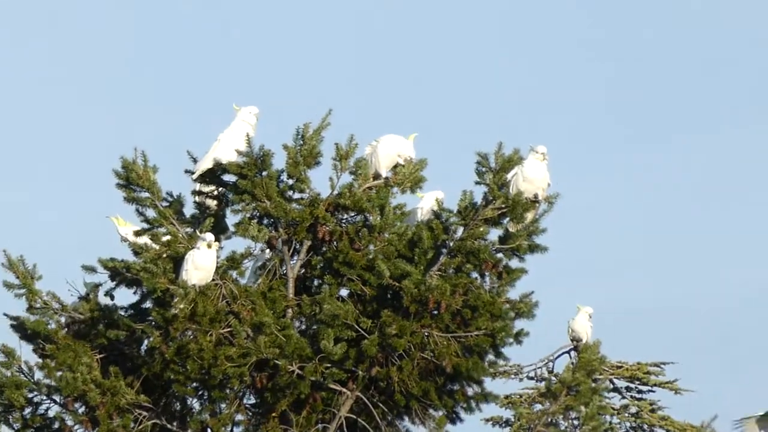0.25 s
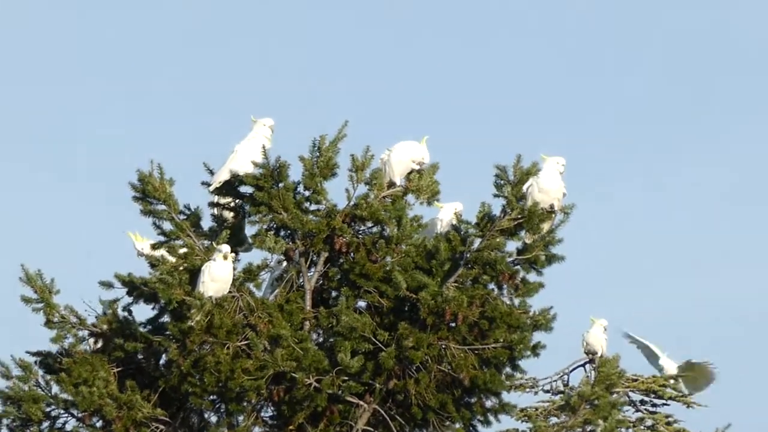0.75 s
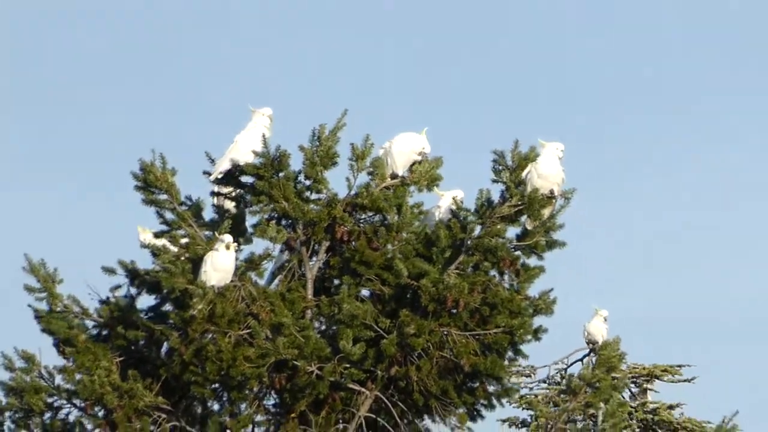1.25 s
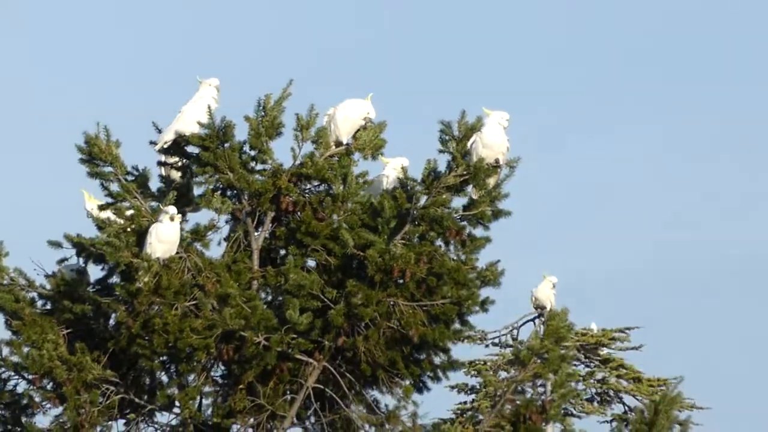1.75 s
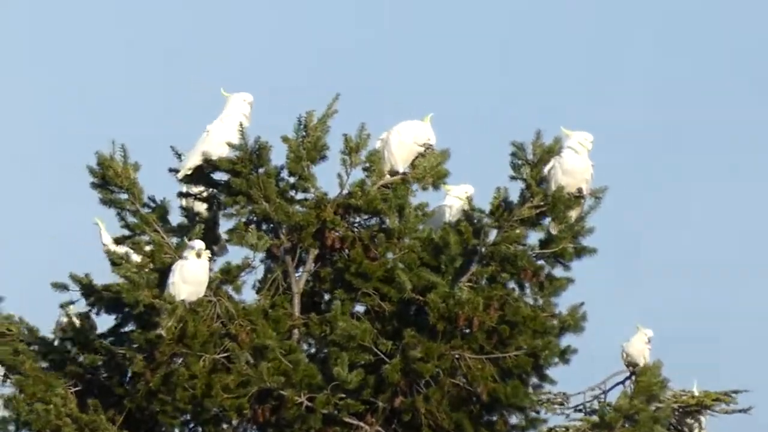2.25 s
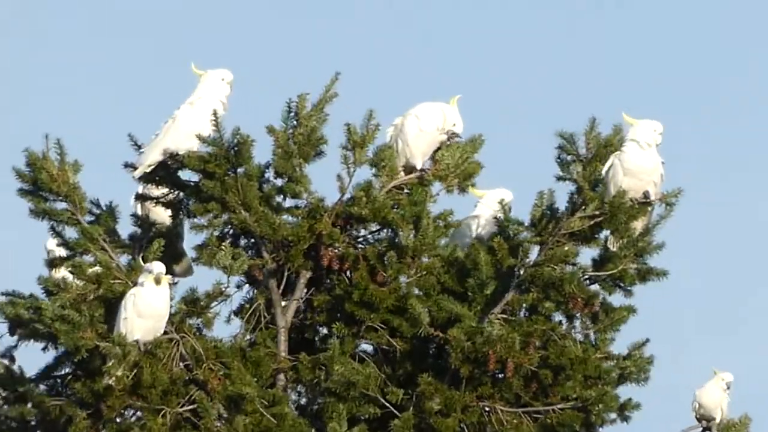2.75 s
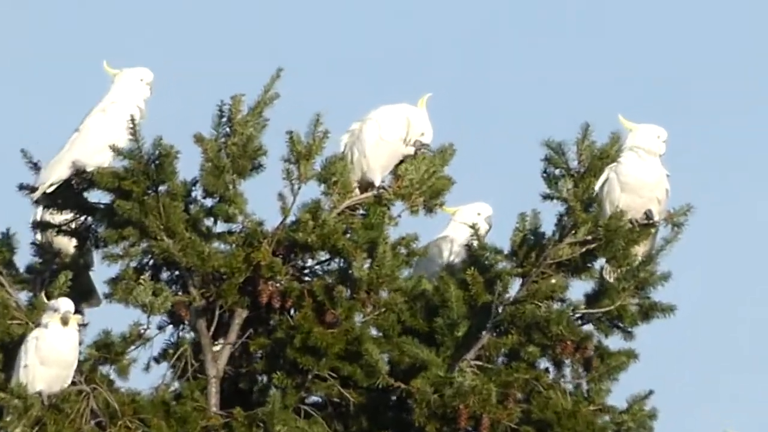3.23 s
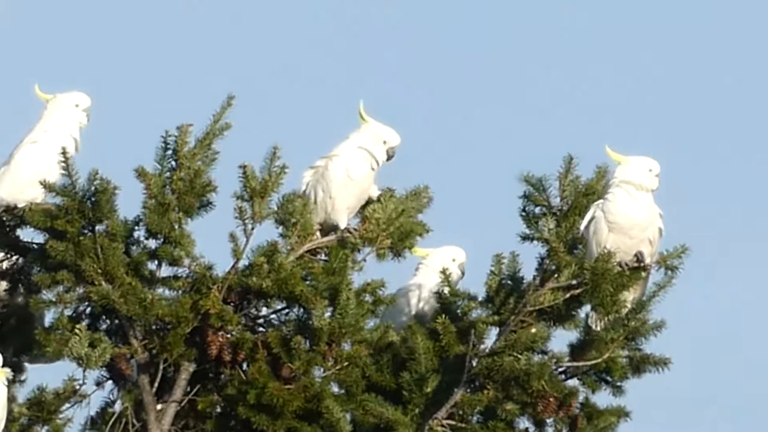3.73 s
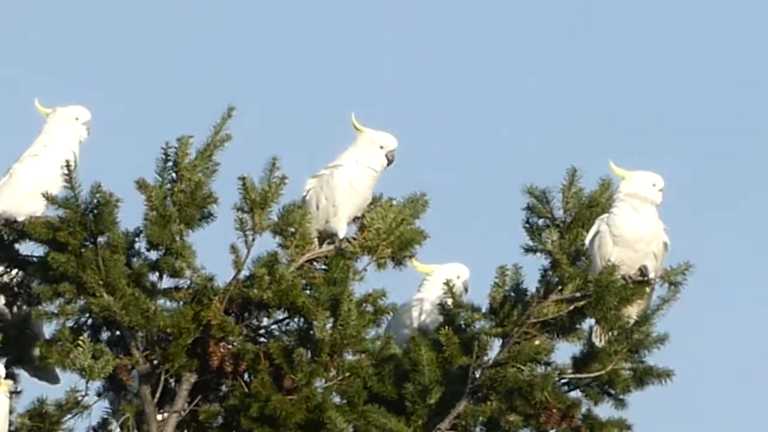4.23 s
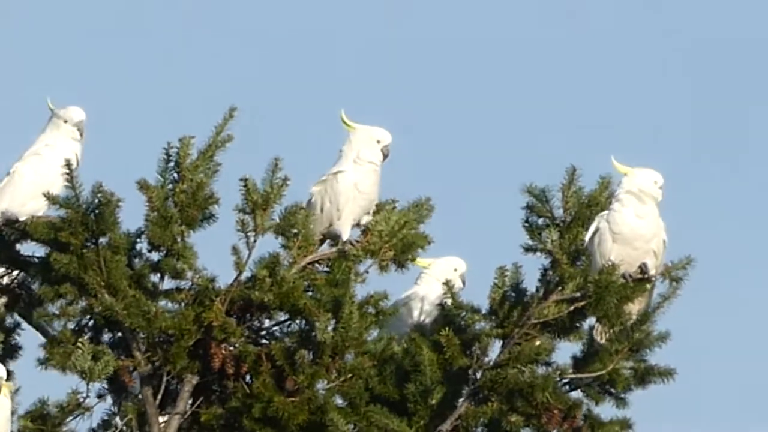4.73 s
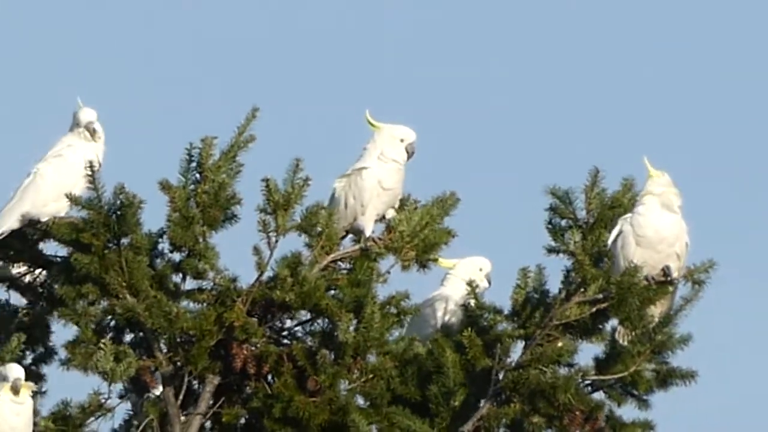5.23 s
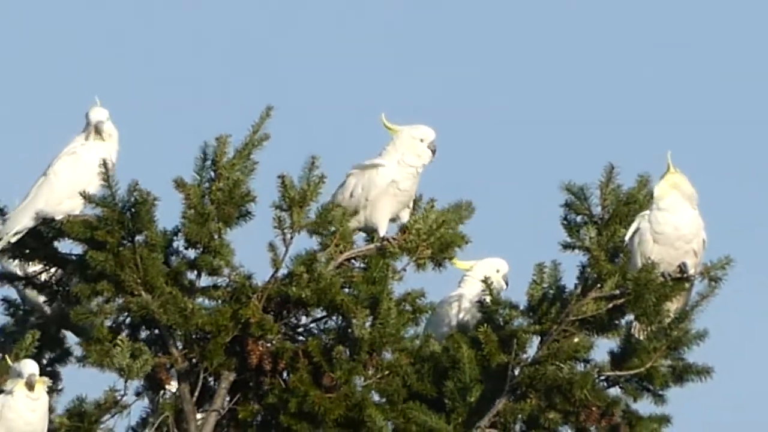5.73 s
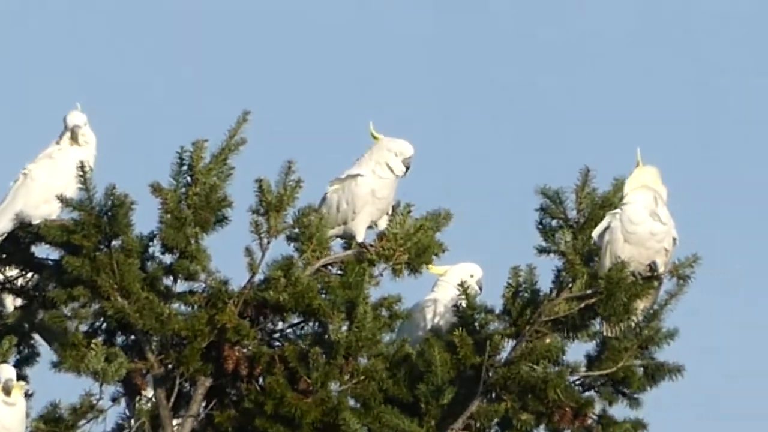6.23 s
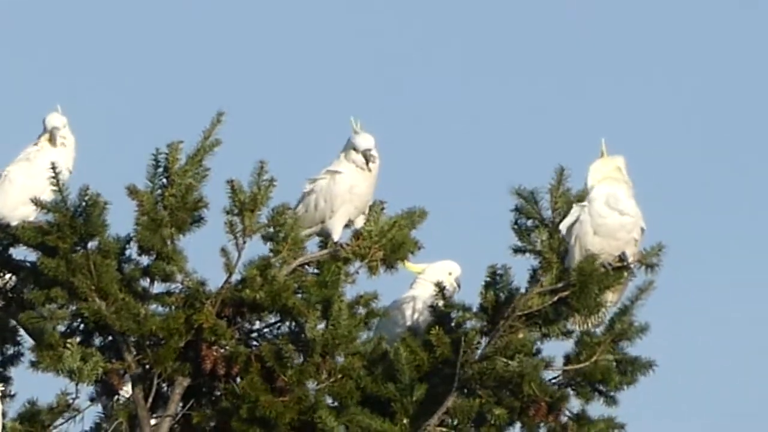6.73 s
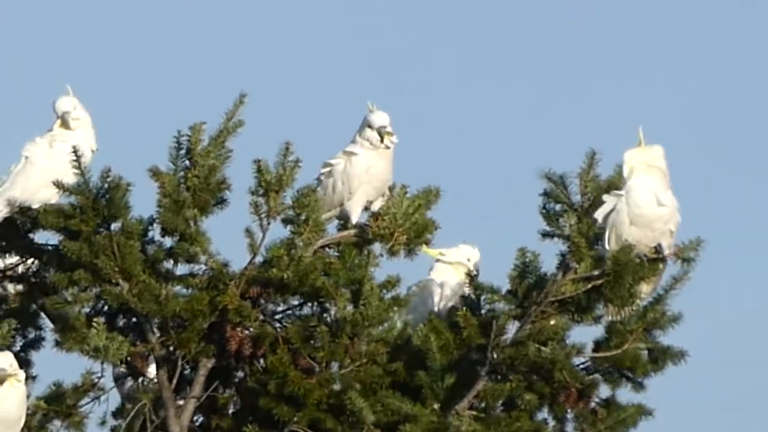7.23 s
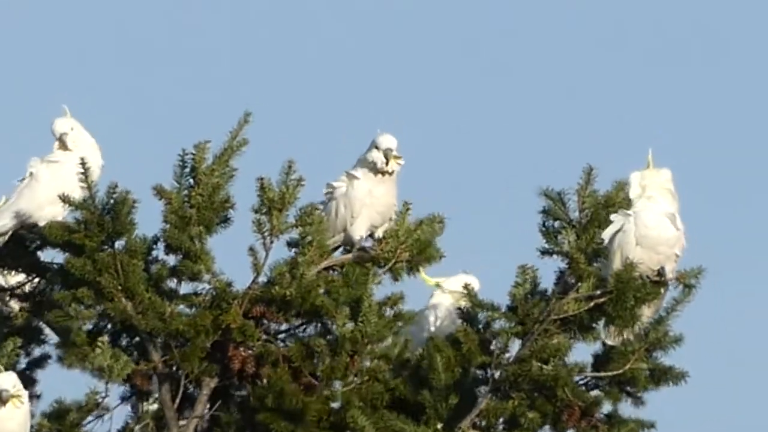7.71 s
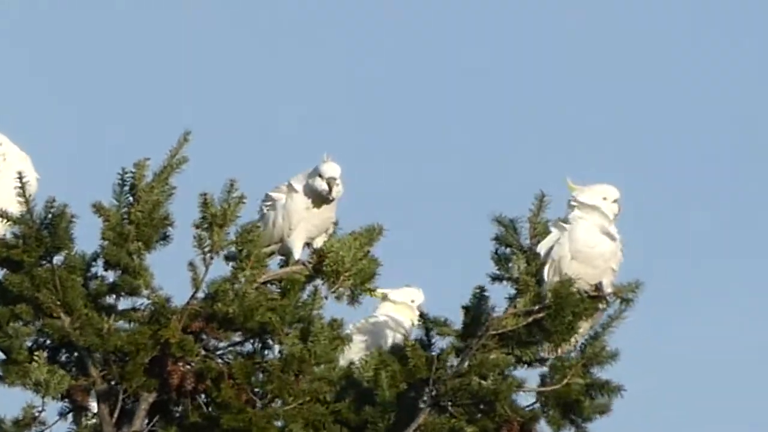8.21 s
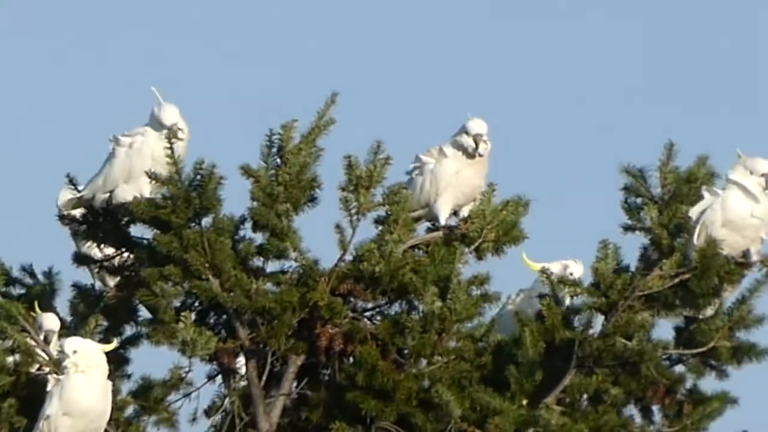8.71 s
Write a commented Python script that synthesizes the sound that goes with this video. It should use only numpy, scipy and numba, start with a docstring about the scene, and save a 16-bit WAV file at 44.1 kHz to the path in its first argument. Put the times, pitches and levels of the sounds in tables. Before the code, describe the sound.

Outdoors, hoarse cockatoo screeches and squawks erupt, pause, then gather again, with thin bird whistles, sharp woody clicks and a faint road.

```python
"""A short hoarse screech and thin gliding whistles sound first, over the steady hiss and roar of a distant road.
Cockatoos call in the crown of a conifer, some calls direct and others mostly by way of the trees.
Syrinx pulses make hoarse screeches, wavering harmonics clear squawks and slapping membranes long rasps, all rung
through throat, mouth and beak. Small birds are gliding sines, dry clicks are decaying woody modes, and rustles,
cheeps and wind are swells of noise. The road is shaped noise that rises and falls; one louder car hums by late on."""
import sys
import numpy as np
from scipy import signal
from scipy.fft import rfft, irfft, next_fast_len
from scipy.io import wavfile
from scipy.ndimage import uniform_filter1d, map_coordinates
from numba import njit

SR = 44100
rng = np.random.default_rng(int(sys.argv[2]) if len(sys.argv) > 2 else 0)


def master_out(mix):
    """Clip the mix to full scale and print it as 16-bit PCM to the path in sys.argv[1]."""
    frames = np.transpose(np.atleast_2d(mix))
    ceiling = np.clip(frames, -1, 1)
    pcm = np.round(ceiling * 32767).astype(np.int16)
    wavfile.write(sys.argv[1], SR, pcm)


N = 395136
TIME = np.arange(N) / SR

# beak resonances of the cockatoos: centre_hz, width_hz, level_db (relative)
BEAK = [(4150, 660, 3), (4870, 1800, 2.5), (6080, 540, -4), (6650, 300, -10), (9300, 430, -41)]
# spectrum of tyre roar on the road: frequency_hz, level_db (per Hz, relative)
TYRE_SPECTRUM = [(40, -45), (250, -24), (450, -2.5), (580, -3.5), (720, -0.5), (1000, -2), (1400, -4),
                 (2000, -6), (2800, -16), (4500, -24.5), (8000, -56)]
# spectrum of the low road rumble: frequency_hz, level_db (per Hz, relative)
RUMBLE_SPECTRUM = [(20, -47), (45, -25), (90, -6.5), (160, -4), (230, 5), (330, 2.5), (450, 2.5),
                   (800, -38)]


def undb(db):
    """Decibels to gain."""
    return 10 ** (np.asarray(db) / 20)


def unit(x):
    """Scale to rms 1."""
    return x / np.sqrt(np.mean(x ** 2) + 1e-20)


def follow(rows, t):
    """The columns of a curve, interpolated at times t."""
    s, *columns = np.transpose(rows)
    return [np.interp(t, s, column) for column in columns]


def wander(n, hz):
    """Smooth random drift of spread about 1, drawing a new value hz times a second."""
    step = max(int(SR / hz), 1)
    steps = np.repeat(rng.standard_normal(n // step + 4), step)
    return 1.2 * uniform_filter1d(steps, step)[step:step + n]  # 1.2 restores the spread lost in smoothing


def arch(progress):
    """The push behind a call: 0 at both ends, 1 in the middle."""
    return 4 * progress * (1 - progress)


def glide(progress, turn, start_hz, turn_hz, end_hz):
    """A pitch that eases into a turning point and curves away again."""
    away = np.interp(progress, [0, min(turn, 1), 1], [1, 0, 1]) ** 2
    far_hz = np.where(progress < turn, start_hz, end_hz)
    return turn_hz + (far_hz - turn_hz) * away


def bell(hz, centre_hz, width_hz):
    """Gain of one steep resonance at hz."""
    return 1 / (1 + ((hz - centre_hz ** 2 / hz) / width_hz) ** 2)


def resonate(x, modes):
    """Parallel resonances, each filtered twice for steepness; rms 1."""
    out = 0
    for hz, width, db in modes:
        b, a = signal.iirpeak(min(hz, SR / 2.3), max(hz / width, .8), fs=SR)
        once = signal.lfilter(b, a, x)
        out = out + undb(db) * signal.lfilter(b, a, once)
    return unit(out)


def formants(x, modes, scale=1):
    """Overlapping steep resonances whose powers add; rms 1."""
    size = next_fast_len(len(x), real=True)
    hz = np.fft.rfftfreq(size, 1 / SR) / scale + 1  # the 1 Hz avoids division by zero
    power = sum((undb(db) * bell(hz, centre, width)) ** 2 for centre, width, db in modes)
    return unit(irfft(rfft(x, size) * np.sqrt(power), size)[:len(x)])


def add(track, s, x):
    """Mix x into the track from time s, cutting what falls outside."""
    i = int(s * SR)
    lo, hi = max(i, 0), min(i + x.shape[-1], N)
    track[..., lo:hi] += x[..., lo - i:hi - i]


def outdoor_noise(spectrum, bass_side_db=8, treble_side_db=-7):
    """Diffuse noise at two close microphones: wide in the bass, nearly alike above."""
    log_hz = np.log(np.fft.rfftfreq(N, 1 / SR) + 1)
    hz, db = np.transpose(spectrum)
    mid, side = rfft(rng.standard_normal((2, N))) * undb(np.interp(log_hz, np.log(hz), db))
    side_db = np.interp(log_hz, np.log([120, 330, 1000]), [bass_side_db, -2, treble_side_db])
    mid, side = irfft(mid, N), irfft(side * undb(side_db), N)
    return np.array([mid + side, mid - side]) / np.std(mid)


def background(tyre_db=1, hiss_db=-59, flicker_db=1, rumble_db=-59.5, rumble_follow=0.23):
    """Tyre roar of the distant road, a rumble that swells with it (dB per dB of roar), and a steady hiss."""
    # swells of the road: time_s, roar_db (before tyre_db is added)
    road_swells = [(.5, -57.5), (1.2, -55), (3.3, -53.5), (3.9, -50.5), (4.5, -42), (5.3, -47.5),
                   (6.8, -46.5), (7.8, -47.5), (8.8, -48)]
    # spectrum of the hiss: frequency_hz, level_db (per Hz, relative)
    hiss_spectrum = [(30, -9), (500, -20), (2200, 4.5), (4000, -2), (6000, -5), (8000, -12), (9800, -10.5),
                     (12500, -17.5), (15500, -24)]
    roar_db, = follow(road_swells, TIME)
    roar = outdoor_noise(TYRE_SPECTRUM) * undb(roar_db + tyre_db + flicker_db * wander(N, 11))
    swell_db = rumble_follow * (roar_db - roar_db.mean())
    rumble = outdoor_noise(RUMBLE_SPECTRUM) * undb(rumble_db + swell_db)
    return roar + rumble + undb(hiss_db) * outdoor_noise(hiss_spectrum)


def syrinx(hz, rough):
    """Membrane pulses; roughness unsettles their timing, adds a second beating vibration and rattling air."""
    n = len(hz)
    jitter = (.18 * rough ** 1.8 + .005) * wander(n, 700)
    jitter = jitter + .05 * rough * wander(n, 90) + .025 * rough * wander(n, 22)
    phase = 2 * np.pi * np.cumsum(hz * (1 + jitter)) / SR
    # a weak fundamental; the upper partials lag, so each pulse is a short chirp
    pulses = unit(sum(min(k / 2, 1) * np.cos(k * phase - .1 * k * k) for k in np.arange(1, 21)))
    second = 2 * np.pi * np.cumsum(hz * (.38 + .07 * wander(n, 18))) / SR
    beating = rough * .8 * np.cos(second)
    roughening = .35 * rough ** 2 * np.tanh(wander(n, 650))
    pulses = unit(pulses * (1 + beating + roughening))
    air = unit(rng.standard_normal(n) * (1 + .6 * np.cos(phase)))
    rattle = 1 + .38 * rough * np.tanh(wander(n, 200))
    return (pulses + .9 * rough ** 1.4 * air) * rattle, air * rattle


def branches(x, count=5):
    """A few short reflections whose paths shift as the bird bobs: partials stand out unevenly and waver."""
    n = np.arange(len(x))
    out = x
    for lag_s in rng.uniform(.001, .009, count):
        lag = SR * (lag_s + .00006 * wander(len(x), 12))
        reflection = map_coordinates(x, [n - lag], order=3)
        out = out + .36 * rng.choice([-1, 1]) * reflection
    return unit(out)


def screeches():
    """Short hoarse syrinx calls through throat, mouth and beak; returns direct sound and feed to the trees."""
    # one screech a row: start_s, length_s, level_db (mouth band, direct and trees together), swell_db (start to
    # end), start_hz, end_hz (pitch), roughness (in mid-call, held to 0-1), throat_db (relative),
    # gape_db (upper minus lower mouth, before the cut and sag below), beak_db (relative),
    # scale (of the mouth resonances, ratio), wet_db (trees relative to direct)
    calls = [ (0, 0.045, -41.5, -12, 731, 707, 1.02, -4.5, -8, -21, 1.16, 1.5),
             (0.97, 0.18, -47.5, 6.5, 621.5, 641, 0.77, -8.5, -4, -18, 0.98, -0.5),
             (1.262, 0.2, -45, 3.5, 776, 700, 0.76, -7.5, 3, -12, 1.1, -5),
             (1.462, 0.22, -41, 4, 641, 600, 0.75, -6, -9, -30, 1.16, -2),
             (5.509, 0.14, -43.5, -2, 690, 762, 0.78, -12, -1, -2.5, 1.15, 8),
             (5.603, 0.093, -37, 1, 793, 889, 0.55, -27, 5, -10.5, 1.24, -0.5),
             (5.711, 0.12, -36, -9, 759.4, 631, 0.73, -10, -3, -20, 1.08, -8.5),
             (5.97, 0.14, -48.5, -17, 570, 543, 0.68, -13, 14, -2.5, 1.02, -11),
             (6.32, 0.12, -46.5, 6, 710, 747, 0.54, -10, 26, -25, 0.98, -10),
             (6.572, 0.12, -43, -12, 618, 627, 0.79, -4, -16, -8, 1.18, -0.5),
             (6.679, 0.21, -39.5, 6, 686.3, 637, 0.6, -10, 0.5, -13.5, 1.13, -0.5),
             (6.885, 0.14, -36.5, 0, 586, 546, 0.61, -24, -3, -8.5, 1.16, -0.5),
             (7.062, 0.125, -52, -12, 623, 610, .55, -20, -6, 2, 0.83, -1),
             (7.777, 0.2, -50, 14, 660, 674, 0.82, -2.5, 8, -15, 1.01, -1),
             (7.952, 0.23, -43.5, 7, 680, 645, 0.63, -18, 4, -14.5, 1.04, -3),
             (8.261, 0.19, -46, -1, 661, 688, .5, -6, -4, -15, 1.06, -3),
             (8.445, 0.21, -34, 1.5, 640.4, 536.5, 0.75, -10, -3, -17, 1.066, 0),
             (8.825, 0.05, -35, 10, 805, 691, 0.59, -3.5, 7, -7, 1.02, -1),
             (8.874, 0.13, -32, 3, 645, 620, 0.58, -5, -4, -16, 1.15, -3.5)]
    # throat resonances: centre_hz, width_hz, level_db (relative)
    throat_modes = [(700, 220, -7), (1230, 460, 0), (1600, 400, -5)]
    # mouth with the beak nearly shut: centre_hz, width_hz, level_db (relative); centre and width before scale
    shut_mouth = [(2086, 480, 5), (2400, 430, 0)]
    # mouth with the beak wide open: centre_hz, width_hz, level_db (relative); centre and width before scale
    open_mouth = [(2870, 410, 0.69), (3260, 290, -1.6)]
    attack_s, attack_share, release_s = .03, .014, .0285  # attack grows by this share of the call's length
    pitch_rise, rough_sag = .00993, .14  # shares: pitch gained in mid-call, roughness lost at both ends
    gape_cut_db, gape_sag_db = 2, 2  # throughout, and further at both ends
    beak_opens_s = .053  # time constant: the treble comes in after the voice
    direct, scattered = np.zeros(N), np.zeros(N)
    for (start, length, db, swell_db, start_hz, end_hz, rough,
         throat_db, gape_db, beak_db, scale, wet_db) in calls:
        t = np.arange(start - attack_s / 2, start + length + release_s / 2, 1 / SR)
        progress = np.linspace(0, 1, len(t))
        push = arch(progress)
        slack = 1 - push
        hz = (start_hz + (end_hz - start_hz) * progress) * (1 + pitch_rise * push)
        source, air = syrinx(hz, np.clip(rough * (1 - rough_sag * slack), 0, 1))
        source = branches(source)
        # a wider beak moves the energy to the upper resonances
        gape = undb(gape_db - gape_cut_db - gape_sag_db * slack)
        mouth = formants(source, shut_mouth, scale) + gape * formants(source, open_mouth, scale)
        mouth = mouth / np.hypot(1, gape)
        beak_gain = undb(beak_db) * (1 - np.exp(-(t - t[0]) / beak_opens_s))
        call = undb(throat_db) * formants(source, throat_modes) + mouth
        call = call + beak_gain * formants(source + air / 2, BEAK)
        fade_in = (t - t[0]) / (attack_s + attack_share * length)
        fade_out = (t[-1] - t) / release_s
        fade = np.sqrt(np.clip(np.minimum(fade_in, fade_out), 0, 1))
        effort = fade * undb(db + swell_db * (progress - .5))
        call = call * effort / np.hypot(1, undb(wet_db))  # far birds arrive more by way of the trees
        add(direct, t[0], call)
        add(scattered, t[0], call * undb(wet_db))
    return direct, scattered


def trees(x, t60=0.93, treble_t60=0.026, early_s=0.27, early_db=8, side_db=-6):
    """Dense early scatter from nearby branches, then a tail that loses its treble first."""
    t = np.arange(SR) / SR
    noise = rng.standard_normal((2, SR))
    low = signal.sosfilt(signal.butter(2, 3800, fs=SR, output="sos"), noise)
    high = signal.sosfilt(signal.butter(2, 3800, "high", fs=SR, output="sos"), noise)
    decay = undb(-60 * t / t60)
    tail = low * decay + high * undb(-60 * t / treble_t60)
    early = 1 + undb(early_db) * np.exp(-t / early_s)
    response = tail * early / np.linalg.norm(early * decay)
    mid, side = signal.fftconvolve(x[None], response, axes=1)[:, :N]
    return np.array([mid + undb(side_db) * side, mid - undb(side_db) * side])


def small_birds(waver=0.0082, flutter_db=2, sag_db=4.5):
    """Thin gliding whistles with a weak octave, softer at both ends than in the middle."""
    # one whistle a row: start_s, length_s, turn (share of the length), start_hz, turn_hz, end_hz (pitch),
    # level_db (in the middle), swell_db (start to end), octave_db (relative)
    whistle_rows = [ (0, 0.19, 0.1, 7900, 8230, 6660, -56.5, 1, -30),
                    (0.201, 0.073, 0.166, 5640, 4430, 4740, -38, -6, -21),
                    (0.261, 0.09, 0.1, 4690, 4736, 5240, -48.5, -10, -16),
                    (0.616, 0.18, 0.85, 8900, 7500, 8200, -57.5, 15, -30),
                    (0.797, 0.21, 0.53, 7800, 7920, 6800, -53, -4, -35),
                    (1.404, 0.07, 0.45, 4780, 4700, 4530, -56, 0, -30),
                    (4.08, 0.08, 0.68, 2054, 2410, 2430, -40.5, 1, -9),
                    (5.669, 0.069, 0.7, 5080, 5350, 5360, -46.5, -2, -35),
                    (5.702, 0.043, .4, 6470, 6370, 6400, -59, 0, -30),
                    (7.837, 0.21, 0.95, 7300, 8200, 8150, -61.5, 0, -30),
                    (8.155, 0.094, 0.36, 4260, 4160, 4700, -45.5, -1, -28),
                    (8.577, 0.24, .52, 8200, 8620, 6860, -66.5, 20, -30)]
    out = np.zeros(N)
    for start, length, turn, start_hz, turn_hz, end_hz, db, swell_db, octave_db in whistle_rows:
        n = int(length * SR)
        progress = np.linspace(0, 1, n)
        hz = glide(progress, turn, start_hz, turn_hz, end_hz)
        phase = 2 * np.pi * np.cumsum(hz * (1 + waver * wander(n, 186))) / SR
        tone = np.sqrt(2) * (np.sin(phase) + undb(octave_db) * np.sin(2 * phase))
        level_db = db + swell_db * (progress - .5) - sag_db * (1 - arch(progress))
        level_db = level_db + flutter_db * wander(n, 94)
        add(out, start, tone * undb(level_db) * signal.windows.tukey(n, .08))
    return out


def puffs(wind_side_db=8, cheep_side_db=-6, rustle_side_db=0):
    """Brief swells of band noise; wind pushes the two microphones in opposite ways."""
    # soft rustles, hoarse far-off cheeps and puffs of wind:
    # centre_s, half_length_s, centre_hz, width_hz, level_db (at the height of the swell)
    puff_rows = [(0.726, 0.016, 3730, 900, -49), (0.722, 0.024, 10000, 9000, -56),
                 (1.082, 0.023, 6750, 700, -52.5), (4.215, 0.051, 5630, 900, -50),
                 (2.807, 0.076, 4760, 600, -48.5), (2.913, 0.073, 4400, 594, -57),
                 (3.501, 0.063, 99.5, 61.3, -53), (7.008, 0.029, 10400, 3970, -57.5),
                 (7.13, 0.055, 9700, 7060, -54), (8.17, 0.037, 137, 127, -32.5), (8.32, 0.1, 116, 81, -47)]
    out = np.zeros((2, N))
    for s, half, hz, width, db in puff_rows:
        t = np.arange(-3 * half, 3 * half, 1 / SR)
        mid, side = resonate(rng.standard_normal((2, len(t))), [(hz, width, 0)])
        side_db = np.interp(hz, [150, 4000, 10000], [wind_side_db, cheep_side_db, rustle_side_db])
        side = side * undb(side_db)
        swell = undb(db) * np.exp(-(t / half) ** 2)
        add(out, s + t[0], unit(np.array([mid + side, mid - side])) * swell)
    return out


def clicks(crack_t60=0.0096, damping=0.56):
    """Short woody rings with a bright crack on top; duller clicks stir little but the main mode."""
    # one dry click a row: start_s, level_db (peak of the ring before panning), treble_db (crack relative to
    # ring), ring_hz, pan_db (left minus right)
    click_rows = [(0.968, -41.5, -11, 3750, -6), (2.96, -35, -9, 3650, -5), (3.0799, -37, -13, 3700, -6),
                  (3.0973, -15, 1.5, 3520, -4.5), (3.1831, -25, -14, 3650, -9),
                  (3.307, -31.5, -20, 3520, -6), (3.5626, -34, -27, 3580, -6),
                  (4.1058, -26.5, -13, 3630, -7), (4.369, -25.5, -4.5, 2960, 1)]
    # modes of the ring: ratio (to ring_hz), t60_s, level_db (relative, before treble_db acts on it)
    click_modes = [(0.381, 0.012, -7), (0.69, 0.012, -1.5), (1, 0.009, 4), (1.48, 0.006, -5.5)]
    out, t = np.zeros((2, N)), np.arange(SR // 40) / SR
    for s, db, treble_db, ring_hz, pan_db in click_rows:
        ring = 0
        for ratio, t60, mode_db in click_modes:
            dulled_db = mode_db + damping * treble_db * abs(np.log2(ratio))
            ring = ring + undb(dulled_db - 60 * t / t60) * np.sin(2 * np.pi * ring_hz * ratio * t)
        ring = ring * np.minimum(t * ring_hz, 1)  # builds up over one cycle
        burst = rng.standard_normal((2, len(t))) * undb(-60 * t / crack_t60)
        crack = resonate(burst, [(8400, 13000, 0)])
        click = ring / np.abs(ring).max() + undb(treble_db) * crack / np.abs(crack).max()
        add(out, s, undb(db + np.array([[pan_db], [-pan_db]]) / 2) * click)
    return out


def squawks(throat_hz=1280, throat_width_hz=480, fundamental_db=-7, beak_db=-24):
    """Clear voiced calls: a wavering harmonic stack through throat and mouth, each partial fluttering."""
    # one squawk a row: start_s, length_s, turn (share of the length), start_hz, turn_hz, end_hz (pitch),
    # level_db (direct and trees together), swell_db (start to end), waver (pitch, share), mouth_hz,
    # mouth_width_hz, throat_db (relative to mouth), wet_db (trees relative to direct)
    squawk_rows = [ (1.107, 0.081, 0.52, 665, 705, 694, -50, 5, 0.0073, 2500, 1000, 2, -21),
                   (1.185, 0.11, 0.55, 825, 859, 852, -42.5, -2, 0.0098, 2150, 1900, -16, -1),
                   (1.271, .2, 0.1, 940, 956, 680, -51, 4, 0.013, 2800, 1200, 11, -1),
                   (1.435, 0.23, 0.4, 638, 607, 602, -44, 6, 0.0035, 2600, 1000, 15, -6),
                   (2.605, 0.094, 0.57, 650, 670.4, 590, -29, 0, 0.0082, 2400, 1510, 5.5, -13),
                   (5.22, .08, .6, 620, 642, 638, -42.5, -6, .003, 2560, 400, -20, -9),
                   (5.463, 0.063, 0.63, 590, 680, 666, -48, -5, 0.015, 2050, 500, -15, -10),
                   (5.599, 0.12, 0.87, 775, 882, 870, -38.5, 10, 0.0063, 2590, 550, -16, -7),
                   (5.695, .11, .1, 745, 750, 640, -36.5, 0, .022, 2500, 1200, 0, -8),
                   (5.793, 0.095, 0.63, 590, 571, 570, -43, -3, 0.0046, 2270, 450, -16, -11),
                   (5.92, .075, .1, 665, 660, 570, -41, 8, .013, 2700, 1500, -5, -10),
                   (6.29, 0.034, 0.68, 560, 602, 580, -48.5, -7, 0.011, 2850, 600, -22, -8),
                   (6.326, 0.066, 0.46, 750, 720, 797, -44.5, 8, 0.013, 2980, 500, -25, -6),
                   (6.377, 0.043, 0.54, 780, 814, 700, -41.5, 5, 0.0083, 2800, 750, -14, -11),
                   (6.529, .055, 0.32, 580, 576, 553, -39, 4, 0.0039, 2810, 750, -11, -12),
                   (6.58, 0.1, 0.5, 625, 617, 640, -45, -15, 0.0097, 3030, 600, -3, -8),
                   (6.737, 0.084, 0.27, 655, 660, 632, -38, -4, 0.0077, 2940, 900, -14, 1),
                   (6.815, .045, .85, 1040, 925, 930, -39, 0, .005, 1900, 500, -20, -12),
                   (6.9, .1, .55, 545, 578, 555, -33.5, 4, .008, 2850, 1300, -22, -11),
                   (6.985, .06, .1, 715, 720, 620, -32, 0, .01, 2800, 1100, -20, -11),
                   (7.072, 0.092, 0.61, 630, 622, 600, -41.5, 5, 0.0061, 2400, 450, -24, -8),
                   (7.985, 0.11, .3, 660, 668, 640, -38.5, 2, 0.011, 2850, 800, -8, -10),
                   (8.095, 0.095, 0.68, 535, 553, 560, -36, 1, 0.005, 2650, 2000, -28, -10),
                   (8.196, 0.063, 0.9, 590, 633, 630, -45.5, 2, 0.005, 2600, 1000, 13, -16),
                   (8.234, 0.085, 0.43, 688, 706, 665, -43, 5, 0.0097, 2050, 350, -22, -14),
                   (8.27, 0.26, 0.37, 640, 608, 649, -37.5, 11, 0.0062, 2850, 960, -4.5, -6),
                   (8.555, 0.076, 0.61, 630, 658, 613, -37.5, -1, 0.0032, 3180, 600, -20, -15),
                   (8.775, .115, 0.2, 770, 781, 693, -36, 7, 0.007, 2800, 1100, 2, -8)]
    top_hz = 4950  # a clear voice has little above this
    hoarse_per_waver = 13  # the more the pitch wavers, the more a fast, hoarse flutter shakes the partials
    direct, scattered = np.zeros(N), np.zeros(N)
    for (start, length, turn, start_hz, turn_hz, end_hz, db, swell_db,
         waver, mouth_hz, width_hz, throat_db, wet_db) in squawk_rows:
        n = int(length * SR)
        progress = np.linspace(0, 1, n)
        hz = glide(progress, turn, start_hz, turn_hz, end_hz)
        hz = hz * (1 + waver * (wander(n, 90) + .4 * wander(n, 600)))
        phase = 2 * np.pi * np.cumsum(hz) / SR
        call = 0
        for k in np.arange(1, 9):
            partial_hz = k * hz
            throat = bell(partial_hz, throat_hz, throat_width_hz)
            throat = throat + undb(fundamental_db) * bell(partial_hz, 695, 110)
            gain = bell(partial_hz, mouth_hz, width_hz) + undb(throat_db) * throat
            gain = gain + undb(beak_db) * bell(partial_hz, 3500, 900)
            gain = gain / (1 + (partial_hz / top_hz) ** 8)
            flutter = undb(2.5 * wander(n, 70)) + hoarse_per_waver * waver * wander(n, 500)
            call = call + gain * flutter * np.cos(k * phase - .3 * k * k)
        call = unit(call) * undb(db + swell_db * (progress - .5)) * signal.windows.tukey(n, .35)
        call = call / np.hypot(1, undb(wet_db))
        add(direct, start, call)
        add(scattered, start, call * undb(wet_db))
    return direct, scattered


@njit
def moving_band(x, hz, width):
    """Band-pass (state-variable filter) whose centre moves with every sample."""
    y, band, low = np.empty(len(x)), 0., 0.
    for i in range(len(x)):
        g, k = np.tan(np.pi * hz[i] / SR), width / hz[i]
        v = (band + g * (x[i] - low)) / (1 + g * (g + k))
        band, low, y[i] = 2 * v - band, low + 2 * g * v, k * v
    return y


def slaps(n, slap_hz=276.4, slap_s=0.0017, leak=0.89):
    """Air let through by membranes that slap shut at uneven intervals and with uneven force; rms 1."""
    gap, force = rng.standard_normal((n // 60, 2)).T
    at = (np.cumsum(np.exp(.25 * gap)) * SR / slap_hz).astype(int)  # slap_hz belongs to the median gap
    pulses = np.bincount(at, undb(1.2 * force))[:n]
    bursts = np.convolve(pulses, np.hanning(int(slap_s * SR)), "same")
    return unit(leak + bursts)


def ringing(hz):
    """An unsteady tone that the voice locks onto a mouth resonance; rms 1."""
    n = len(hz)
    hz = hz * (1 + .022 * wander(n, 450) + .018 * wander(n, 60))
    return unit(np.sin(2 * np.pi * np.cumsum(hz) / SR) * undb(1.5 * wander(n, 80)))


def rasps(voice_hz=610, mouth_width_hz=440.0, beak_db=-11, beak_follow=0.3, throat_follow=0.69,
          upper_follow=0.249, tremble_db=1.1):
    """Long rasps: slaps chop a chaotic voice and two ringing tones, which move as the beak opens and closes."""
    # one rasp a row: throat_db (relative, before it follows the gape), shrill_db (relative to lower mouth),
    # tone_db (ringing, relative), upper_hz (mean of the upper tone), wet_db (trees relative to direct), curve of
    # time_s, level_db (mouth, direct and trees together), mouth_hz, gape_db (upper minus lower mouth),
    # edge_db (treble edge, relative)
    rasp_rows = [ (-13.5, -16.5, 0, 3040, -3.5, [(1.595, -43, 2116, -5, -48), (1.638, -26.5, 2186, 0, -47),
                 (1.72, -21, 2282, 1.5, -30.5), (1.79, -21.5, 2293, 4.5, -18.5),
                 (1.86, -21, 2560, 0, -18.5), (1.9, -20, 2520, 0, -30), (2.005, -21, 2438, -3.5, -29.5),
                 (2.05, -24.5, 2323, 3, -22), (2.1, -30, 2500, 8, -45)]),
                 (-11, -17, 0.5, 2680, -4, [(2.085, -28, 2400, -2, -46), (2.13, -26.5, 2395, 0.5, -59),
                 (2.2, -23.5, 2326, -4, -79), (2.265, -24.5, 2447, 3, -76), (2.315, -36, 2320, 6, -47)]),
                 (-12, -26, -2.5, 3010, -7, [(2.3, -35, 2150, -9, -38), (2.35, -28.5, 2170, 2.5, -25),
                 (2.41, -20, 2260, -1, -28), (2.47, -21.5, 2313, 1, -30), (2.57, -23, 2241, 1, -28),
                 (2.62, -25, 2306, 3, -25), (2.685, -33.5, 2123, -10, -28)]),
                 (-23, -12, -0.5, 2700, -0.5, [(4.185, -52, 2093, -6, -50), (4.21, -35, 2100, -5, -42),
                 (4.245, -33, 2260, -3, -47), (4.376, -35, 2325, 0, -57), (4.43, -39.5, 2325, -2, -43),
                 (4.48, -37, 2355, -10, -58), (4.59, -40.5, 2260, 4, -42), (4.63, -47, 2390, -5, -52)]),
                 (-5.5, -11.5, -1.5, 2850, -3, [(4.655, -45, 2050, -4, -27), (4.75, -32, 2480, -1.5, -67),
                 (4.84, -31.5, 2470, 0, -71), (4.9, -28, 2380, -2.5, -61), (4.99, -34.5, 2250, -7, -52),
                 (5.06, -36.5, 2180, -7.5, -45), (5.17, -40, 2258, -8, -59), (5.215, -35.5, 2320, -8, -53),
                 (5.25, -49, 2480, -2, -44), (5.3, -66, 2530, -12, -58)])]
    # fixed resonances of a rasp, all four tables: centre_hz, width_hz, level_db (relative)
    # shrill band above the mouth
    shrill_modes = [(3540, 700, 0), (4020, 680, 1.5)]
    # throat
    rasp_throat = [(750, 420, -11), (1247, 520, -3), (1640, 530, -4.5)]
    # upper mouth
    upper_mouth = [(2760, 220, -3.5), (3060, 350, -5), (3400, 340, -4)]
    # treble edge of the slapping air
    edge_modes = [(7200, 1400, 0.5), (9900, 1500, -4.5)]
    direct, scattered = np.zeros(N), np.zeros(N)
    for throat_db, shrill_db, tone_db, upper_hz, wet_db, curve in rasp_rows:
        t = np.arange(curve[0][0], curve[-1][0], 1 / SR)
        db, mouth_hz, gape_db, edge_db = follow(curve, t)
        voice, air = syrinx(voice_hz * (1 + .06 * wander(len(t), 25)), .8)
        slap = slaps(len(t))
        source = slap * branches(voice)
        tone = undb(tone_db) * slap
        lower = moving_band(source, mouth_hz, mouth_width_hz)
        lower = unit(moving_band(lower, mouth_hz, mouth_width_hz))
        lower = unit(lower + .7 * tone * ringing(mouth_hz))
        upper_tone_hz = upper_hz + upper_follow * (mouth_hz - mouth_hz.mean())
        upper = unit(formants(source, upper_mouth) + tone * ringing(upper_tone_hz))
        gape = undb(gape_db + tremble_db * wander(len(t), 32.4))  # the beak trembles
        call = lower + gape * upper + undb(shrill_db) * formants(source, shrill_modes)
        call = call / np.hypot(1, gape)
        call = call + undb(throat_db + throat_follow * gape_db) * formants(source, rasp_throat)
        # beak_db holds where the treble edge is at -29 dB
        call = call + undb(beak_db + beak_follow * (edge_db + 29)) * formants(source, BEAK)
        call = call + undb(edge_db) * formants(slap * air, edge_modes)
        call = call * undb(db) * signal.windows.tukey(len(t), .06) / np.hypot(1, undb(wet_db))
        add(direct, t[0], call)
        add(scattered, t[0], call * undb(wet_db))
    return direct, scattered


def passing_car(s=7.262, half_s=0.36, hz=760, width_hz=420, hum_db=-40, roar_db=-48, rumble_db=-50):
    """One louder car hums by on its tyres, with a roar and rumble of its own, in a smooth swell about s."""
    hum = undb(hum_db) * resonate(outdoor_noise(TYRE_SPECTRUM), [(hz, width_hz, 0)])
    roar = undb(roar_db) * outdoor_noise(TYRE_SPECTRUM)
    rumble = undb(rumble_db) * outdoor_noise(RUMBLE_SPECTRUM)
    return (hum + roar + rumble) * np.exp(-((TIME - s) / half_s) ** 2)


def scene(pan_db=-1.5, whistle_wet_db=-7):
    """Birds (panned left minus right by pan_db) and their echoes, near sounds, the road."""
    direct, scattered = np.sum([screeches(), rasps(), squawks()], axis=0)
    whistles = small_birds()
    birds = (direct + whistles) * undb(np.array([[pan_db], [-pan_db]]) / 2)
    echoes = trees(scattered + undb(whistle_wet_db) * whistles)
    return birds + echoes + clicks() + puffs() + background() + passing_car()


def record(dry, top_hz=15600):
    """The recorder behind the microphones rounds the loudest peaks and cuts the top."""
    rounded = .8 * np.tanh(dry / .8)
    return signal.sosfilt(signal.ellip(8, .2, 70, top_hz, fs=SR, output="sos"), rounded)


dry = scene()
out = record(dry)
master_out(out)
```